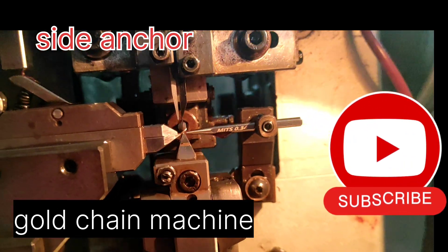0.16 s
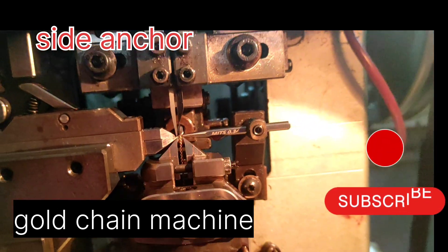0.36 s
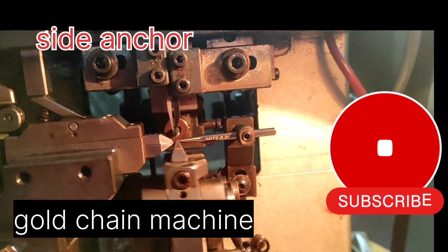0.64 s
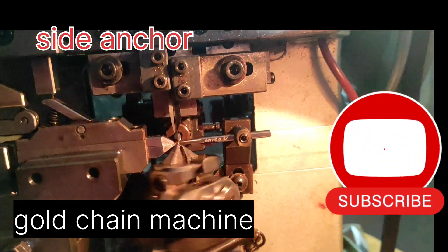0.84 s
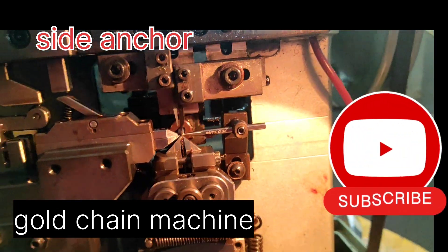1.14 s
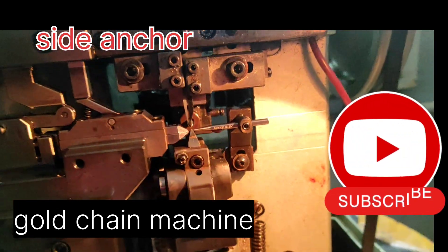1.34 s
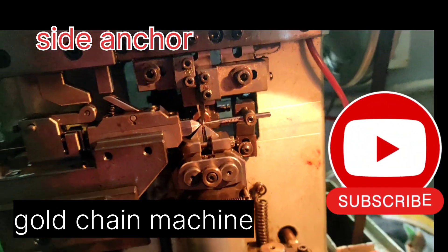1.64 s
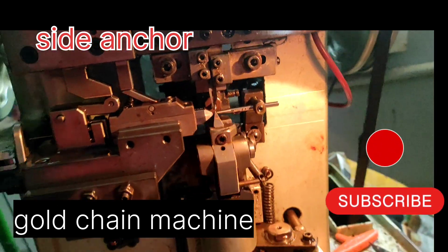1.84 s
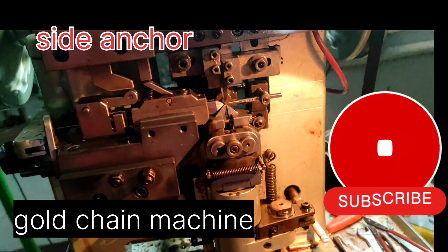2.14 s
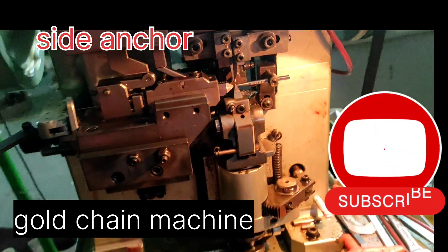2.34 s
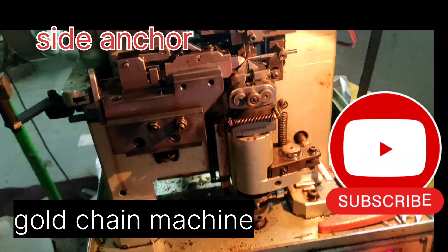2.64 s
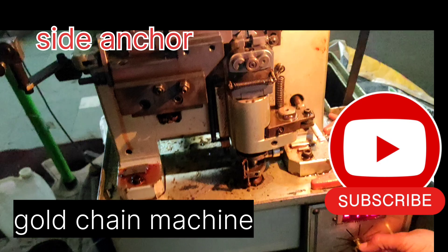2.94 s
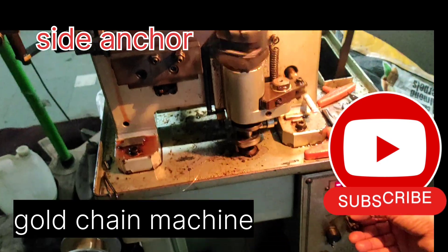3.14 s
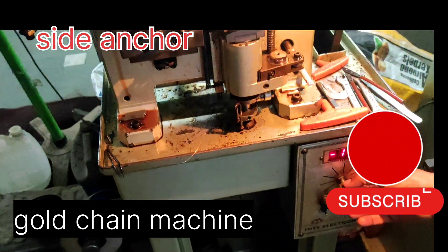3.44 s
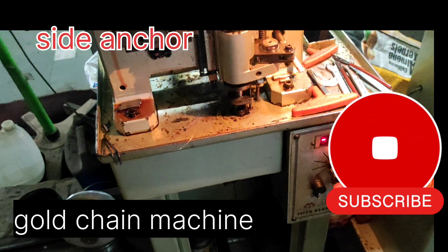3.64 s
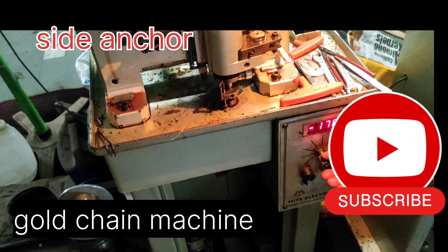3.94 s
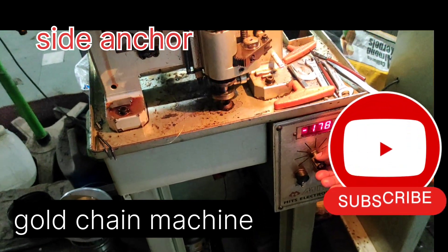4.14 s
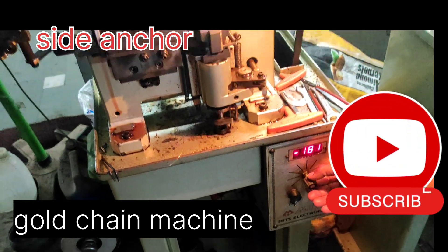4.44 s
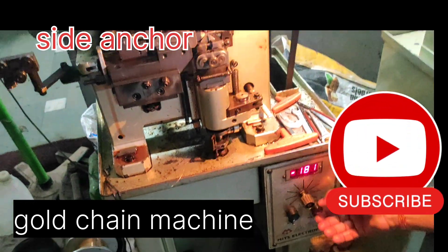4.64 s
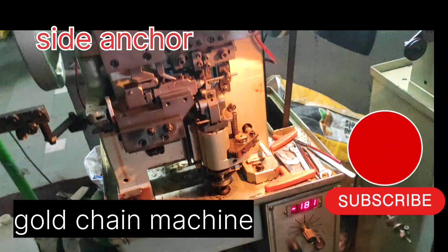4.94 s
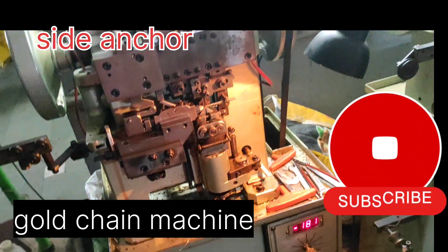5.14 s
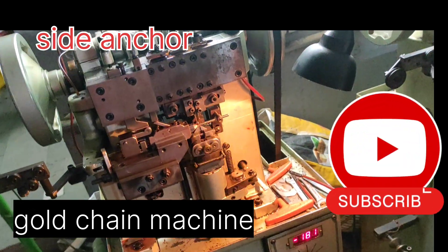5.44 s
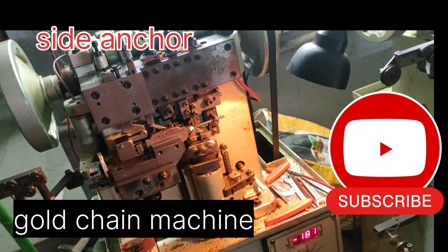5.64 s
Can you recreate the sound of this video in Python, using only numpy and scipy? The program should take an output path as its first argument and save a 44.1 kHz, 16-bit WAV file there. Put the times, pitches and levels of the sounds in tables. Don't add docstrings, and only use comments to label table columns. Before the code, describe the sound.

Close mechanical clatter in a workshop: wavering low motor hum, gear rumble, brisk irregular metal clicks and knocks, and gritty sliding scrapes.

```python
import sys
import numpy as np
from scipy import signal
from scipy.fft import rfft, irfft, dct
from scipy.io import wavfile
from scipy.ndimage import uniform_filter1d

SR = 44100
rng = np.random.default_rng(int(sys.argv[2]) if len(sys.argv) > 2 else 0)


def gain_from_db(level_db):
    decades = np.asarray(level_db, float) / 20
    return 10 ** decades


def unload_audio(sound):
    columns = np.transpose(np.atleast_2d(sound))
    steps = np.round(np.clip(columns, -1, 1) * 32767)
    wavfile.write(sys.argv[1], SR, steps.astype(np.int16))


N = 255339
HZ = np.fft.rfftfreq(N, 1 / SR)
STROKE_RISE_S = 0.007

# start_s, cam_edge_db, top_of_dust_db,
# left_minus_right_db
CAMERA_AIM = [
    (0, 1.5, 2.5, 1),
    (1.7, 0, 5, -0.5),
    (2.7, -0.5, 2, 1.5),
    (3.3, -1.5, 6, 0),
    (3.5, 1, -6, 0.5),
    (3.9, 3, -5, 1),
    (4.3, 2, -4, 1),
    (4.9, 3, -7, 0),
    (5.05, 1.5, 4.5, 0),
    (5.79, 0, 12, 0),
]


def evened(x):
    return x / np.sqrt(np.mean(x ** 2) + 1e-20)


def read(points, hz):
    f, value = np.transpose(points)
    return np.interp(np.log(hz + 1), np.log(f + 1), value)


def column(rows, order):
    rows = np.asarray(rows)
    return np.interp(np.arange(N) / SR, rows[:, 0], rows[:, order])


def lumps(size):
    once = uniform_filter1d(rng.standard_normal(N), size=size)
    return evened(uniform_filter1d(once, size=size))


def strokes(rows, rest_db, rise_s, order=1):
    power = np.full(N + SR, gain_from_db(rest_db) ** 2)
    t = np.arange(SR // 2) / SR
    for row in rows:
        start_s, length_s = row[0], row[2]
        shape = np.minimum(t / rise_s, 1) ** 2 * np.exp(-(t / length_s) ** 2)
        power[round(start_s * SR):][:len(t)] += gain_from_db(row[order]) ** 2 * shape
    return 10 * np.log10(power[:N])


def contacts(per_s, spread_db, smooth):
    bunch = lumps(size=300)
    size = gain_from_db(spread_db * (np.minimum(rng.exponential(1, N), 5) / 2 + bunch))
    hits = rng.random(N) < per_s / SR
    ticks = size * hits * rng.standard_normal((2, N))
    return evened(ticks) + smooth * rng.standard_normal((2, N))


def ports(drive, gain):
    # pitch_hz, side_minus_mid_db
    width_curve = [(40, -10), (80, -7), (110, -11), (200, -17), (380, -8.5), (700, -3), (1290, 0),
                   (2380, -0.5), (4400, 0.5), (8120, 1), (15000, -0.5)]
    # pitch_hz, left_minus_right_db
    balance_curve = [(30, -2), (60, 1), (110, 1.5), (200, 2.5), (380, 3.5), (700, 1), (1290, 1.5),
                     (2380, 0), (4400, 0), (6500, -3), (9000, 2.5), (13000, -3.5)]
    mid, side = rfft(drive) * gain
    side = side * gain_from_db(read(width_curve, HZ))
    lean = gain_from_db(read(balance_curve, HZ) / 2)
    pair = irfft([(mid + side) * lean, (mid - side) / lean], N)
    return pair / np.sqrt(np.mean(pair.mean(0) ** 2))


def motor():
    # start_s, level_db
    hum_levels = [(0.0, -28), (0.09, -49), (0.16, -49), (0.19, -36), (0.74, -37), (1.1, -28.5), (1.23, -46),
                  (1.27, -32), (3.66, -29), (3.69, -34), (4.24, -25.5), (4.81, -34), (5.11, -29),
                  (5.18, -54), (5.32, -30.5), (5.79, -32)]
    # pitch_hz, width_hz, level_db
    panel_table = [(44.7, 4.4, -25), (81.7, 11, -15.5), (156.3, 38, -4), (178, 22, -6), (212.3, 21.4, 0.5),
                   (245, 23.5, 0.5), (291, 20, -4.5), (334.4, 7.6, -5)]
    # start_s, level_db, length_s
    thump_table = [(0.0, -27, 0.042), (0.075, -23.5, 0.051), (0.19, -31, 0.085), (0.35, -32, 0.023),
                   (0.68, -27.5, 0.071), (0.83, -21, 0.02), (1.07, -45, 0.069), (1.32, -29, 0.19),
                   (1.77, -23, 0.023), (1.95, -27, 0.051), (2.07, -24.5, 0.045), (2.39, -23.5, 0.04),
                   (2.78, -25, 0.039), (2.85, -16.5, 0.014), (3.17, -31.5, 0.27), (3.45, -28, 0.035),
                   (3.7, -25, 0.098), (4.02, -28.5, 0.089), (4.19, -21.5, 0.022), (4.33, -41, .05),
                   (4.54, -26, 0.14), (4.67, -26, 0.019), (4.97, -25, 0.039), (5.2, -21, 0.035),
                   (5.37, -26.5, 0.06)]
    hum_hz, waver_hz = 198.9, 2.8
    waver = evened(uniform_filter1d(rng.standard_normal(N), size=6000))
    hum = np.sqrt(2) * np.cos(2 * np.pi * np.cumsum(hum_hz + waver_hz * waver) / SR)
    panels = sum(gain_from_db(db) ** 2 / (1 + (2 * (HZ - hz) / width) ** 2) ** 2 for hz, width, db in panel_table)
    boom = ports(rng.standard_normal((2, N)), np.sqrt(panels))
    hum_db = column(hum_levels, order=1)
    boom_db = strokes(thump_table, rest_db=-33, rise_s=0.017)
    boom_db = boom_db + 0.065 * (hum_db - hum_db.mean())
    hum = hum * gain_from_db(hum_db - 2.0 + 0.74 * lumps(size=1500)) * gain_from_db([[1.7], [-1.7]])
    return hum + boom * gain_from_db(boom_db - 2.0)


def gears(cam_db):
    # pitch_hz, level_db (per Hz)
    gear_colour = [(18, -58), (30, -54), (103, -45), (134, -7.5), (167, -39), (198, -8), (366, -13.5),
                   (817, -17.5), (949, -19), (2600, -26), (3380, -30), (5720, -120)]
    above_boom = 1 / np.sqrt(1 + (380 / (HZ + 1)) ** 4) + gain_from_db(-3.5)
    sound = ports(contacts(6000, spread_db=1.9, smooth=1.53), gain_from_db(read(gear_colour, HZ)) * above_boom)
    gear_db = -33.03 + 0.27 * (cam_db - cam_db.mean()) - 0.5 * lumps(size=900)
    casing = irfft(rfft(sound) / (1 + (HZ / 650) ** 6), N)
    teeth = sound - casing
    sound = casing * gain_from_db(0.84 * lumps(size=1200)) + teeth * gain_from_db(1.98 * lumps(size=1200))
    return sound * gain_from_db(gear_db)


def cams(cam_db):
    # pitch_hz, level_db (per Hz)
    cam_colour = [(1060, -2), (1800, 1.5), (2500, 1.5), (3230, 0), (4020, 2), (4420, 0.5), (5300, 1),
                  (7280, -8), (12300, -120)]
    edge_hz, edge_width_hz = 4600, 1200
    sound = ports(contacts(5000, spread_db=2.1, smooth=0.64), gain_from_db(read(cam_colour, HZ)))
    edge = irfft(rfft(sound) * np.exp(-((HZ - edge_hz) / edge_width_hz) ** 2), N)
    sound = sound + (gain_from_db(column(CAMERA_AIM, order=1)) - 1) * edge
    return sound * gain_from_db(cam_db - 1.0)


def slides():
    # start_s, rub_db, length_s, fine_dust_db
    rub_table = [(0.205,-39.5,0.11,-65), (0.419,-37.5,0.052,-65), (0.519,-40,0.2,-62.5),
                 (0.875,-36.5,0.091,-59), (1.06,-40,0.22,-65), (1.29,-38.5,0.072,-70),
                 (1.515,-36.5,0.082,-67), (1.696,-39.5,0.11,-72), (1.816,-36,0.1,-60.5),
                 (2.021,-40,0.083,-65), (2.16,-36.5,0.063,-65), (2.33,-38,0.26,-63.5),
                 (2.797,-32,0.073,-57), (2.955,-32,0.074,-55), (3.09,-36.5,0.15,-60),
                 (3.198,-42.5,0.49,-61), (3.397,-39,0.15,-55), (3.637,-37,0.25,-54.5),
                 (3.817,-40,0.22,-57.5), (4.081,-37.5,0.13,-54.5), (4.275,-32.5,0.044,-54),
                 (4.36,-39,0.21,-54.5), (4.495,-39,0.05,-59), (4.651,-36.5,0.18,-55),
                 (4.924,-35,0.077,-54.5), (5.032,-34,0.091,-49), (5.183,-41.5,0.14,-71),
                 (5.333,-34.5,0.12,-60), (5.482,-31.5,0.051,-61), (5.567,-38,0.14,-68),
                 (5.757,-32.5,0.028,-71)]
    # pitch_hz, level_db (per Hz)
    rub_colour = [(2820, -33), (5300, -5.5), (6200, 2), (7750, -1.5), (8600, -8), (10000, -36.5),
                  (13000, -52), (22000, -120)]
    # pitch_hz, level_db (per Hz)
    dust_colour = [(5470, -26), (9300, 2), (9980, 0), (11200, -5.5), (15000, -15), (16000, -12.5)]
    ridge_hz, ridge_width_hz, ridge_db = 6620, 450, 1.5
    ridge = ridge_db * np.exp(-((HZ - ridge_hz) / ridge_width_hz) ** 2)
    rub = ports(contacts(7600, spread_db=2.4, smooth=0.92), gain_from_db(read(rub_colour, HZ) + ridge))
    dust = ports(contacts(10000, spread_db=2.4, smooth=0.6), gain_from_db(read(dust_colour, HZ)))
    top = irfft(rfft(dust) / (1 + (12500 / (HZ + 1)) ** 12), N)
    dust = dust + (gain_from_db(column(CAMERA_AIM, order=2)) - 1) * top
    rub_db = strokes(rub_table, rest_db=-44.5, rise_s=STROKE_RISE_S)
    dust_db = strokes(rub_table, rest_db=-67, rise_s=STROKE_RISE_S, order=3)
    return rub * gain_from_db(rub_db + 1.77) + dust * gain_from_db(dust_db + 7.0)


def patchy(x):
    patch_db = 1.9
    z = signal.stft(x, nperseg=2048)[2]
    field = uniform_filter1d(rng.standard_normal(z.shape[1:]), size=3, axis=0)
    field = evened(uniform_filter1d(field, size=5, axis=1))
    return signal.istft(z * gain_from_db(patch_db * field - patch_db / 4), nperseg=2048)[1][:, :N]


def motion():
    # start_s, rattle_db, length_s
    lobe_table = [(0.03, -43.5, 0.066), (0.205, -38.5, 0.036), (0.459, -34, 0.033), (0.649, -37.5, 0.17),
                  (0.863, -38, 0.3), (1.282, -38.5, 0.085), (1.457, -41, 0.33), (1.651, -39.5, 0.11),
                  (1.821, -34.5, 0.25), (2.02, -31.5, 0.1), (2.33, -33, 0.036), (2.36, -35, 0.28),
                  (2.544, -35.5, 0.14), (2.799, -28.5, 0.089), (2.955, -31, 0.21), (3.238, -33, 0.27),
                  (3.437, -39, 0.42), (3.667, -31.5, 0.042), (3.692, -32.5, 0.085), (3.806, -30, 0.15),
                  (4.091, -33, 0.33), (4.34, -38.5, 0.18), (4.505, -31, 0.1), (4.65, -32.5, 0.2),
                  (4.939, -32, 0.17), (5.039, -33, 0.089), (5.173, -36, 0.13), (5.358, -28.5, 0.073),
                  (5.48, -32, 0.18), (5.597, -48.5, 0.2)]
    cam_db = strokes(lobe_table, rest_db=-44, rise_s=STROKE_RISE_S)
    return patchy(gears(cam_db) + cams(cam_db) + slides())


def knocks():
    # pitch_hz, level_db, t60_s (time to fall 60 dB)
    steel_modes = [(1183, 10.5, 0.023), (1795, 3, 0.031), (2520, 11.5, 0.006), (2684, 11, 0.0052),
                   (4005, 7, 0.0078), (4260, -1, 0.009), (5030, 12, 0.0036), (6046, 10, 0.023),
                   (6936, 13.5, 0.0093), (7370, 1.5, 0.029), (7680, 10.5, 0.01)]
    # start_s, peak_db, low_body_db, bright_edge_db, left_minus_right_db
    blow_table = [(0.2167, -23, -24, -6, 3), (0.2460, -23.5, -26, 3, 4), (0.2704, -18, 2, -3, 8),
                  (0.885, -15.5, -9.5, -6, 3.5), (0.9164, -12.5, -25, -14, 4), (1.004, -17, -4, -21, 3),
                  (1.479, -18.5, -14.5, -10, 9.5), (1.5181, -17, -13, -8, 3.5), (2.025, -13.5, -28, -10, 0),
                  (2.091, -16, -17.5, -14, 3), (2.37, -22, -12, -4, 16), (2.799, -24, -27, 0, 2),
                  (2.8085, -27, -19, -13, 1), (2.8592, -13, -11, -13, 2), (2.9592, -10.5, -18, -9, 5),
                  (3.27, -17, -14, -17, 4), (3.467, -18, -16, -8, -1), (3.7248, -14.5, -12, -23, 6),
                  (3.8210, -8, -15.5, -7, 5), (4.366, -23, -17, -12, 5), (4.655, -13, -31, -12, 7),
                  (4.9553, -22, -43, -31, 3), (5.0427, -17.5, -16, -14, -18), (5.3788, -15.5, -13, -10, 8),
                  (5.4874, -10, -22.5, -9, 0)]
    # start_s, peak_db, bright_edge_db
    tick_table = [(0.342, -28.5, 2), (0.429, -30, 0), (0.5703, -22.5, -8), (0.672, -24, -17),
                  (0.967, -26, -4), (1.069, -26, 11), (1.3022, -25, 9), (1.83, -23, -28),
                  (1.8875, -23.5, -24), (2.0707, -22, -23), (2.1798, -19, -9), (2.2452, -22.5, -4),
                  (2.332, -23, 0), (2.563, -21.5, -10), (2.6506, -19.5, -26), (2.7169, -22, 2),
                  (2.938, -18.5, -8), (3.094, -22, -25), (3.4436, -25, -23), (3.527, -20.5, -24),
                  (4.01, -21, -3), (4.1055, -20, 11), (4.2445, -21.5, 1), (4.3895, -40, -10),
                  (4.846, -21, 10), (5.2, -19.5, -12), (5.257, -19, 18), (5.3431, -18, -16),
                  (5.465, -16.5, -8), (5.6216, -21, 3),
                  (0.1034, -30, 3), (0.531, -28, -3), (0.6894, -27, 2), (1.1924, -23.5, 2),
                   (1.3508, -24, -1), (1.6304, -28, -11), (1.6752, -24.5, -14), (1.7544, -22, -1),
                   (1.9224, -28, -5), (2.4613, -44, -5), (2.5154, -20.5, 0), (3.0194, -19, -9),
                   (3.3044, -31, -14), (3.3694, -22, -12), (3.6497, -23, 3), (4.0846, -23.5, -10),
                   (4.1242, -16, -6), (4.2953, -30, 1), (4.5083, -25, 6), (4.574, -23, -8),
                   (4.6281, -19.5, -11), (4.695, -16.5, -11), (4.7502, -20, 6), (4.926, -28, 2),
                   (5.0614, -18, -6), (5.683, -21.5, 8), (5.7636, -26, -12)]
    tick_body_db, tick_pan_db = -9, 3
    build_s, strike_s, crack_s, lead_s = 0.002, 0.0053, 0.0014, 0.001
    out = np.zeros((2, N + 4000))
    t = np.arange(2000) / SR
    hz, mode_db, t60 = np.transpose(steel_modes)[:, :, None]
    ticks = [(s, db, tick_body_db, bright_db, tick_pan_db) for s, db, bright_db in tick_table]
    for s, peak_db, low_db, bright_db, pan_db in blow_table + ticks:
        chatter = rng.standard_normal((2, len(t)))
        strike = np.minimum(t / build_s, 1) * np.exp(-(t / strike_s) ** 4)
        chatter *= np.minimum(t / 0.0004, 1) * (strike + 0.1 * np.exp(-t / 0.016))
        colour_db = np.where(hz < 2700, low_db + 10.0, np.where(hz > 5300, bright_db + 0.3, 0))
        colour_db = colour_db - 6.6 * (hz < 2000)
        mode_hz = hz * (1 + 0.035 * rng.standard_normal(hz.shape))
        modes = gain_from_db(mode_db + colour_db - 60 * t / t60) * np.sin(2 * np.pi * mode_hz * t)
        knock = signal.fftconvolve(chatter, modes.sum(0)[None], axes=1)
        crack = np.convolve(rng.standard_normal(len(t)), [1, -0.19, 0, 0, -2.2, 0, 0.2, 0, 1], "same")
        crack = crack * t / crack_s * np.exp(-t / crack_s)
        knock[:, :len(t)] += gain_from_db(-5) * abs(knock).max() * crack / abs(crack).max()
        knock[1] = knock[0] + 0.65 * knock[1]
        knock *= gain_from_db(peak_db + 1.5) / abs(knock.mean(0)).max() * gain_from_db([[pan_db / 2], [-pan_db / 2]])
        out[:, round((s - lead_s) * SR):][:, :knock.shape[1]] += knock
    blunt = signal.butter(6, 9000, fs=SR, output="sos")
    return signal.sosfilt(blunt, out[:, :N])


def snaps():
    # start_s, peak_db
    snap_table = [(0.2154, -61), (0.8834, -47), (0.9164, -53), (1.5174, -42), (2.0248, -51), (2.0911, -50),
                  (2.3314, -52), (2.7152, -63), (2.797, -50), (2.9582, -44), (3.8212, -40), (4.6553, -58),
                  (5.4869, -34)]
    snap_s = 0.0018
    out = np.zeros((2, N + 1000))
    t = np.arange(800) / SR
    band = signal.butter(2, [9600, 12500], "band", fs=SR, output="sos")
    ceiling = signal.butter(10, 15600, fs=SR, output="sos")
    top = np.vstack([band, ceiling])
    for s, peak_db in snap_table:
        burst = signal.sosfilt(top, rng.standard_normal((2, len(t)))) * t / snap_s * np.exp(-t / snap_s)
        out[:, round(s * SR):][:, :len(t)] += gain_from_db(peak_db - 0.5) * burst / abs(burst.mean(0)).max()
    return out[:, :N]


def struck_parts(rows, trim_db, chatter_s, cycles, apart):
    # ratio (times the main pitch), level_db
    partial_table = [(1, 4), (1.37, -2.5), (.74, -8.5), (1.8, -6)]
    out = np.zeros((2, N + 8000))
    t = np.arange(4000) / SR
    ratio, partial_db = np.transpose(partial_table)[:, :, None]
    for s, peak_db, hz in rows:
        chatter = rng.standard_normal((2, len(t))) * t * np.exp(-t / chatter_s)
        partials = gain_from_db(partial_db - 60 * t * hz / cycles) * np.sin(2 * np.pi * hz * ratio * t)
        knock = signal.fftconvolve(chatter, partials.sum(0)[None], axes=1)
        knock = np.array([knock[0] + apart * knock[1], 0.68 * (knock[0] - apart * knock[1])])
        knock *= gain_from_db(peak_db + trim_db) / abs(knock.mean(0)).max()
        out[:, round((s - chatter_s) * SR):][:, :knock.shape[1]] += knock
    return out[:, :N]


def clunks():
    # start_s, peak_db, pitch_hz
    clunk_table = [(0.376, -22, 1250), (0.423, -24, 830), (0.475, -22, 710), (0.654, -29, 660),
                   (0.755, -21.5, 1210), (0.887, -21.5, 1030), (0.919, -20.5, 740), (0.981, -28, 950),
                   (1.015, -23, 1150), (1.182, -30, 830), (1.392, -24.5, 778), (1.47, -23, 1070),
                   (1.519, -28, 1250), (1.598, -22, 1250), (1.632, -31, 923), (1.789, -24, 791),
                   (1.836, -28, 900), (1.893, -19, 990), (2.026, -26, 1050), (2.091, -28, 595),
                   (2.159, -26, 834), (2.311, -25, 1200), (2.585, -23, 1670), (2.633, -19.5, 845),
                   (2.81, -21, 1150), (2.96, -14, 2120), (3.038, -25, 1070), (3.095, -17.5, 1040),
                   (3.218, -23, 804), (3.27, -19.5, 1030), (3.303, -22, 826), (3.347, -30, 654),
                   (3.395, -21.5, 721), (3.461, -24, 1150), (3.529, -19, 1130), (3.71, -16.5, 1000),
                   (3.786, -24, 730), (3.826, -25, 1230), (3.89, -14, 1164), (3.951, -18, 1050),
                   (4.026, -23.5, 740), (4.212, -17.5, 760), (4.507, -30, 1160), (4.657, -21, 770),
                   (4.758, -26, 694), (4.866, -27, 690), (4.931, -26, 820), (5.046, -19, 1980),
                   (5.129, -23, 1170), (5.295, -25, 775), (5.344, -23, 1030), (5.377, -21, 770),
                   (5.458, -34, 676), (5.558, -25, 1140)]
    return struck_parts(clunk_table, trim_db=-4.0, chatter_s=0.0017, cycles=39, apart=0.7)


def bumps():
    # start_s, peak_db, pitch_hz
    bump_table = [(0.078, -15, 240), (0.213, -11, 263), (0.642, -29, 320), (0.848, -20, 256),
                  (1.402, -30, 275), (1.505, -15, 234), (1.567, -19, 275), (1.788, -25, 248),
                  (1.919, -20, 235), (2.318, -21, 253), (2.395, -29, 245), (2.594, -16, 330),
                  (2.792, -21, 246), (2.866, -12, 234), (3.259, -19, 261), (3.36, -20, 244),
                  (3.433, -29, 256), (3.506, -21, 264), (3.621, -29, 237), (3.682, -31, 291),
                  (4.028, -17, 323), (4.091, -18, 250), (4.156, -26, 237), (4.348, -18, 297),
                  (4.573, -20, 237), (4.768, -18, 237), (4.983, -19, 318), (5.163, -24, 337),
                  (5.269, -25, 293), (5.43, -26, 260)]
    return struck_parts(bump_table, trim_db=-11.0, chatter_s=0.004, cycles=34, apart=0.26)


def rings():
    # start_s, pitch_hz, length_s, level_db
    ring_table = [(0.0, 500, .08, -39.5), (0.149, 746, 0.14, -43.5), (0.022, 800, 0.098, -42),
                  (1.3, 840, 0.12, -49), (1.753, 573, 0.096, -48), (2.1, 850, 0.094, -49),
                  (2.822, 430, .1, -42), (2.86, 351, .07, -36), (2.583, 320.3, .06, -37.5),
                  (3.421, 283.7, 0.069, -33.5), (2.12, 270.4, .1, -36.5), (2.76, 820, .05, -43),
                  (2.947, 1048, 0.21, -42.5), (3.194, 340, .15, -46), (3.55, 1181, 0.3, -44.5),
                  (3.848, 399.6, .15, -41), (4.017, 333.7, 0.25, -42), (4.602, 335.4, .15, -39),
                  (4.948, 336.7, 0.21, -38), (5.298, 240, 0.12, -38)]
    ring_width_hz = 25
    out = np.zeros((2, N + SR))
    r = np.exp(-np.pi * ring_width_hz / SR)
    for s, hz, length_s, db in ring_table:
        t = np.arange(0, 2 * length_s, 1 / SR)
        shaking = rng.standard_normal((2, SR)).T @ [1, 1j]
        drive = signal.lfilter([1], [1, -r], shaking)[-len(t):]
        ring = evened((drive * np.exp(2j * np.pi * hz * t)).real) * np.sin(np.pi * t / t[-1])
        out[:, round(s * SR):][:, :len(t)] += gain_from_db(db) * ring * gain_from_db([[1.5], [-1.5]])
    return out[:, :N]


def workshop(x, t60):
    t = np.arange(SR // 2) / SR
    signs = rng.choice([-1., 1.], (2, len(t)))
    hits = rng.random((2, len(t))) < 2500 / SR
    taps = signs * hits * gain_from_db(-60 * t / t60) * (t > 0.004)
    return signal.fftconvolve(x, taps / np.linalg.norm(taps[0]), axes=1)[:, :N]


def scene():
    tools = knocks()
    room = motor() + motion() + tools + clunks() + bumps() + rings()
    room = room + gain_from_db(-1) * workshop(tools, t60=0.066)
    return room * gain_from_db(np.outer([0.5, -0.5], column(CAMERA_AIM, order=3)))


def gate(x, size, count):
    # pitch_hz, level_db
    bar_curve = [(300, -20), (800, -10), (1500, -5), (2500, -3.2), (3400, -1.2), (4800, 0), (6200, -2.5),
                 (8400, -1.2), (8800, 2.8), (9050, 0.2), (9400, 1.5), (9600, 9.5), (9850, 7), (10400, 5.6),
                 (11000, 4.8), (14300, 4.6), (15000, 7.2), (15800, 9.5), (15850, 60)]
    spare_ratio, spare_db, spare_hz = 4.5, -14, 9500
    window = signal.windows.kaiser_bessel_derived(2 * size, 4 * np.pi)
    frames = N // size + 2
    places = size * np.arange(frames)[:, None] + np.arange(2 * size)
    padded = np.pad(x, ((0, 0), (size - count, 3 * size)))
    a, b, c, d = np.split(padded[:, places] * window, 4, axis=2)
    z = dct(np.concatenate([-c[..., ::-1] - d, a - b[..., ::-1]], axis=2), type=4, norm="ortho")
    power = (z ** 2).mean(0)
    local_db = 10 * np.log10(uniform_filter1d(power, size=60, axis=1) + 1e-20)
    local_db = np.minimum(uniform_filter1d(local_db, size=3, axis=0), local_db + 1.5)
    patches = evened(uniform_filter1d(rng.standard_normal((frames, size // 8)), size=3, axis=0))
    patches = np.repeat(np.clip(patches, -3, 1.35), 8, axis=1)
    starved_db = 0.7 * rng.standard_normal((frames, 1)) + 3.7 * patches
    starved_db = starved_db - 0.2 * (local_db - local_db.mean(0))
    bursts = (np.diff(padded, axis=1, append=0)[:, places] * window) ** 2
    bursts = bursts.mean(0).reshape(frames, 16, -1).mean(2)[:, 4:12]
    sharp = bursts.max(1) > spare_ratio * np.median(bursts, axis=1)
    starved_db = starved_db + spare_db * sharp[:, None] * (np.arange(size) * SR / size / 2 < spare_hz)
    tone_hz = (np.arange(size) + 0.5) * SR / size / 2
    bar = gain_from_db(local_db + read(bar_curve, tone_hz) + starved_db) ** 2
    late, early = np.split(dct(z * (power > bar), type=4, norm="ortho"), 2, axis=2)
    pieces = np.concatenate([early, -early[..., ::-1], -late[..., ::-1], -late], axis=2) * window
    joined = pieces[:, 1:, :size] + pieces[:, :-1, size:]
    return joined.reshape(2, -1)[:, :N - count]


def top_cut(x):
    return signal.sosfilt(signal.butter(12, 16380, fs=SR, output="sos"), x)


def record(dry):
    untouched = 272
    thinned = gate(dry, size=1024, count=untouched)
    mix = np.concatenate([dry[:, :untouched], thinned], axis=1) + snaps()
    return top_cut(mix)


dry = scene()
out = record(dry)
unload_audio(out)
```